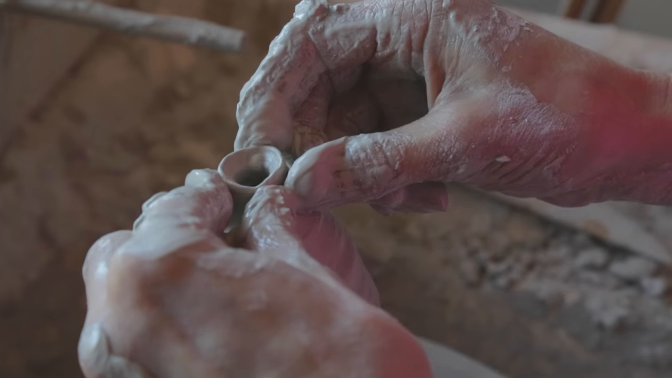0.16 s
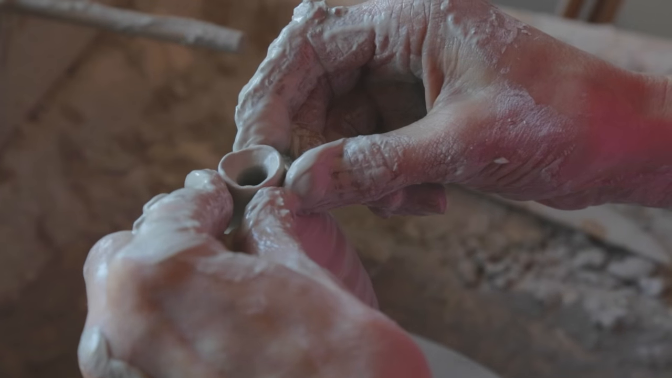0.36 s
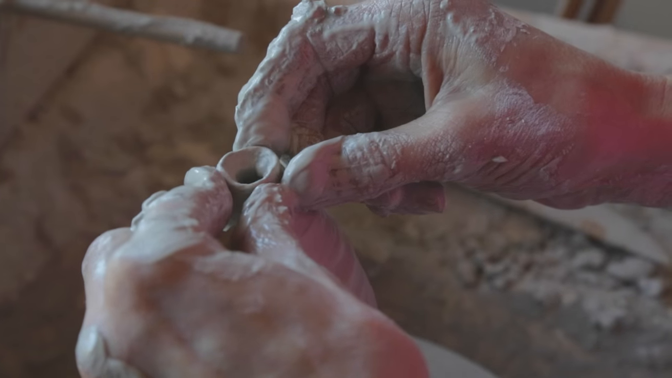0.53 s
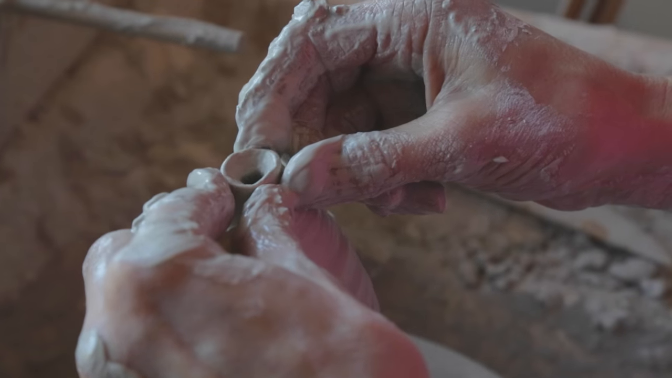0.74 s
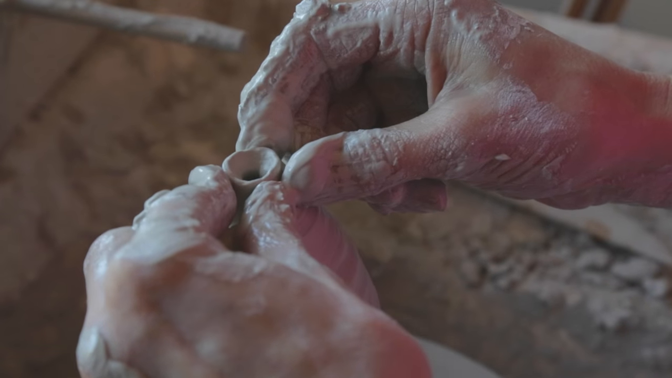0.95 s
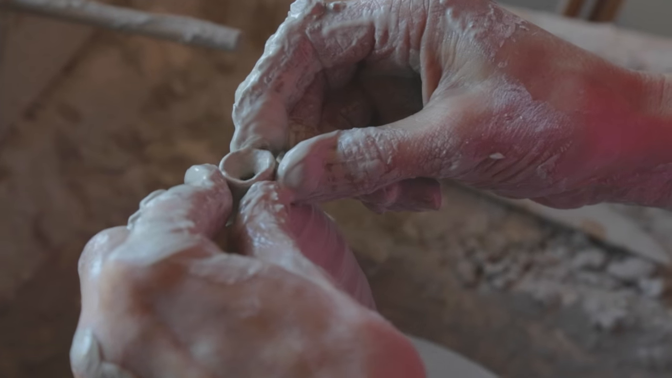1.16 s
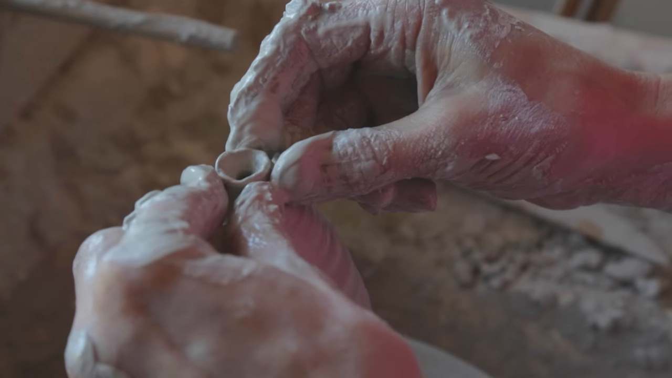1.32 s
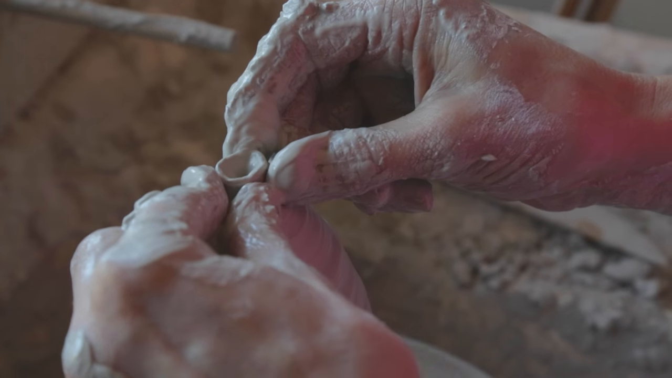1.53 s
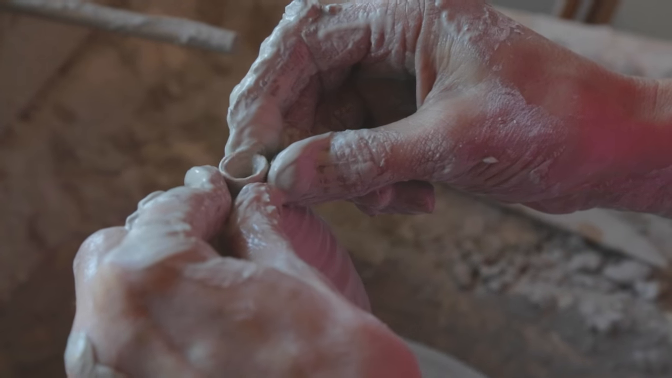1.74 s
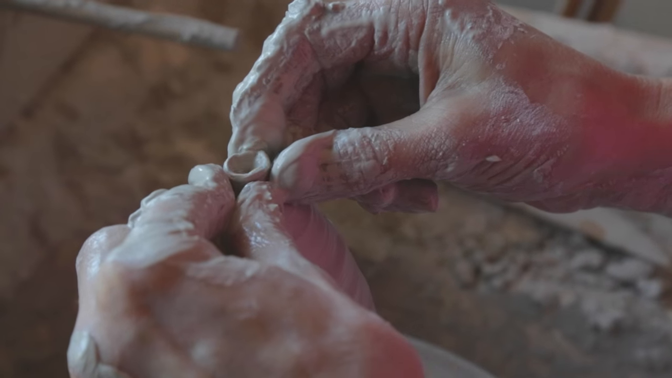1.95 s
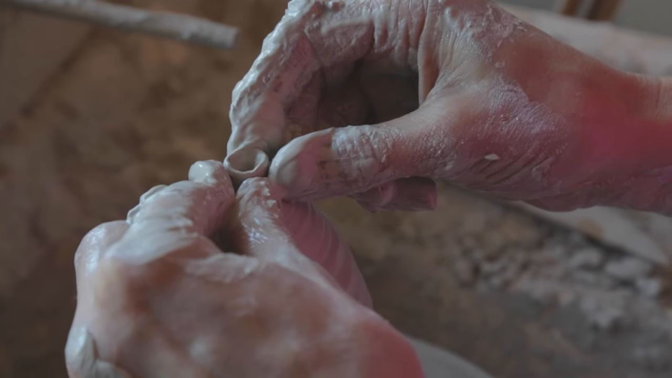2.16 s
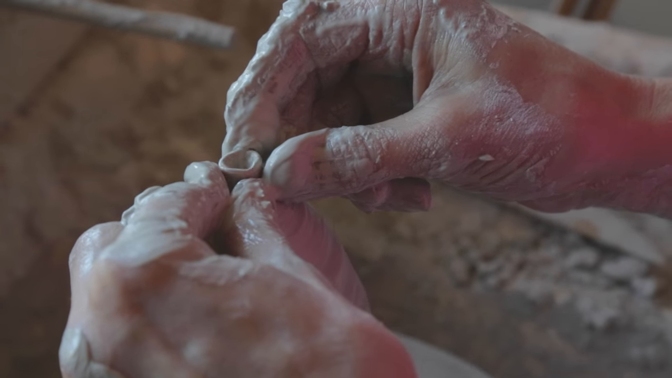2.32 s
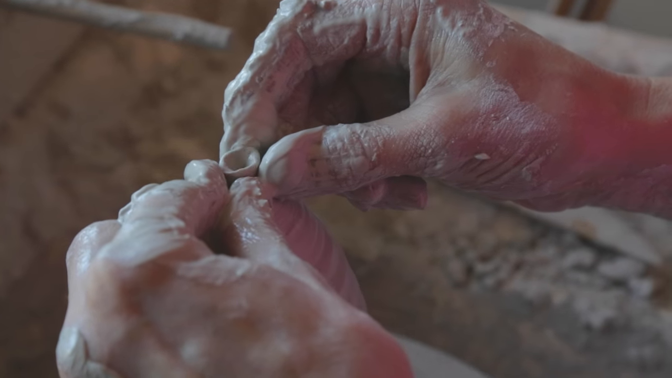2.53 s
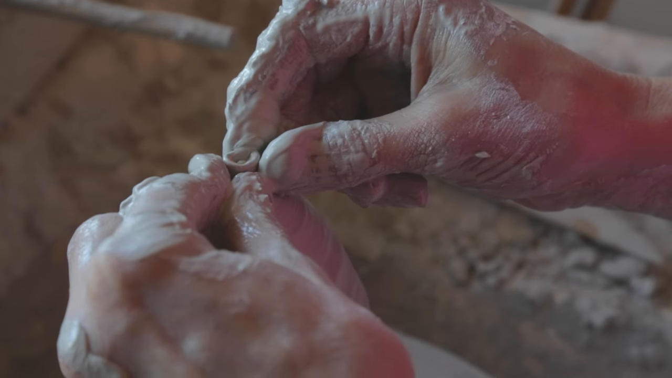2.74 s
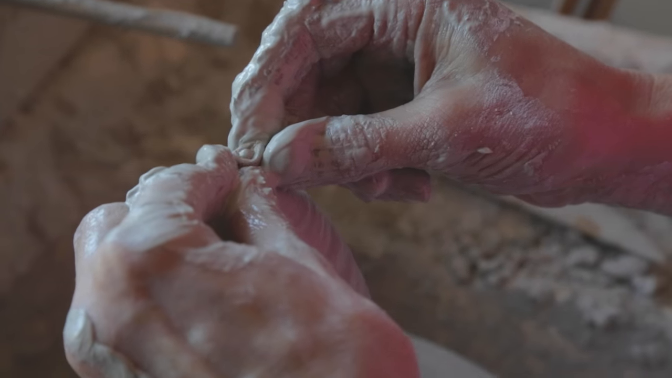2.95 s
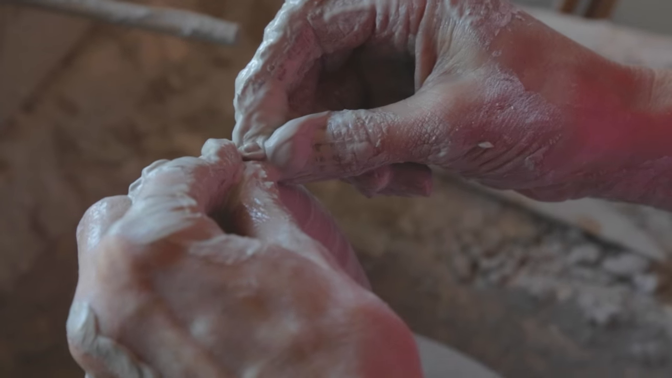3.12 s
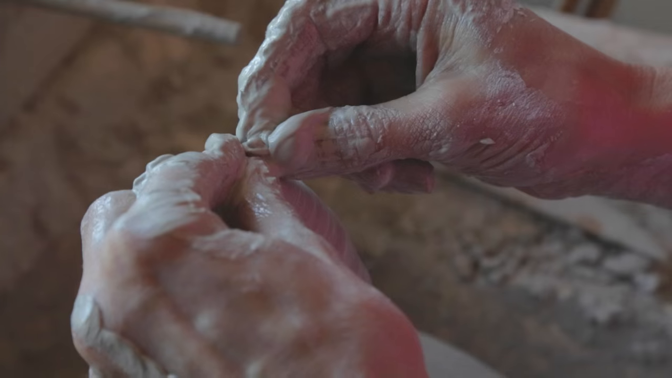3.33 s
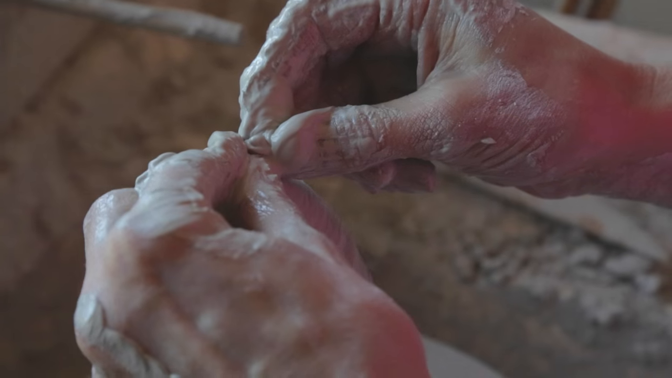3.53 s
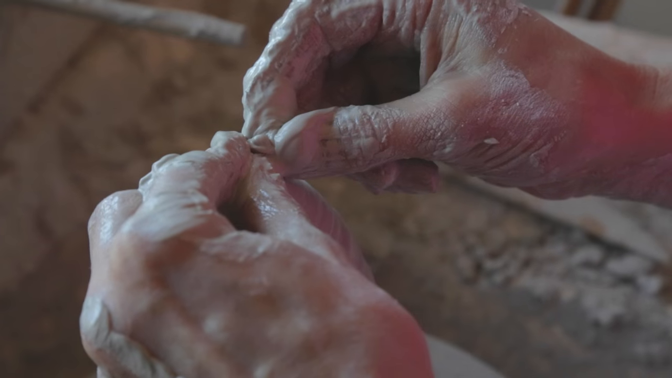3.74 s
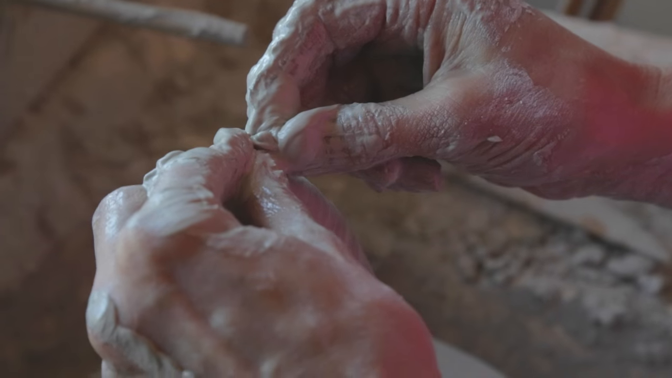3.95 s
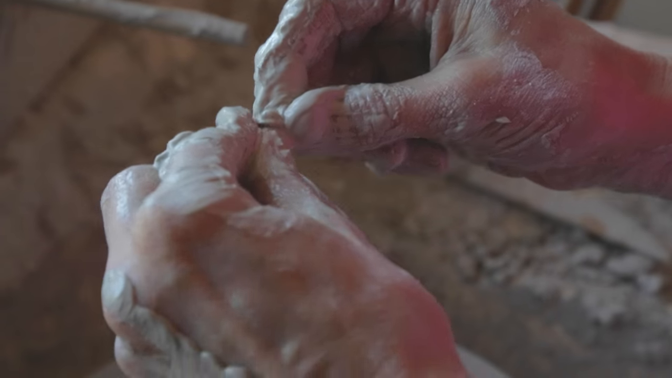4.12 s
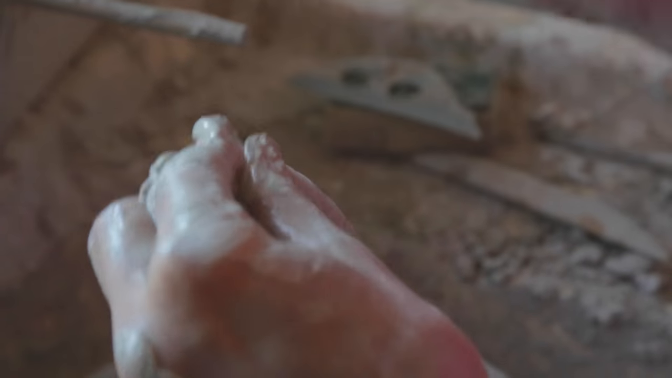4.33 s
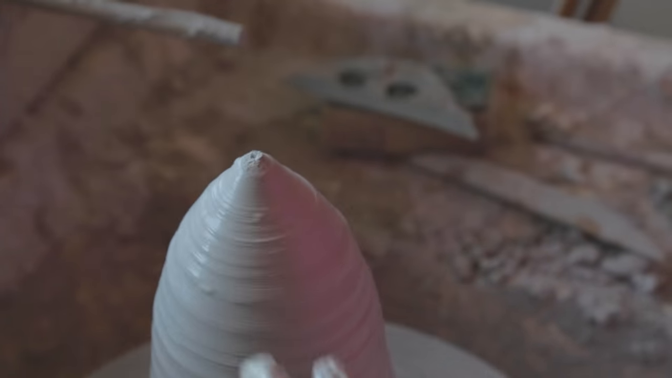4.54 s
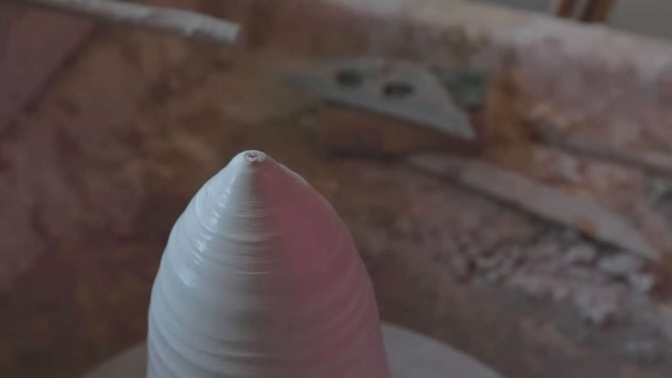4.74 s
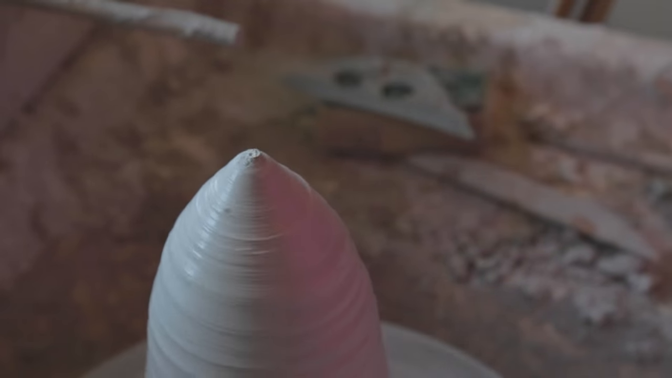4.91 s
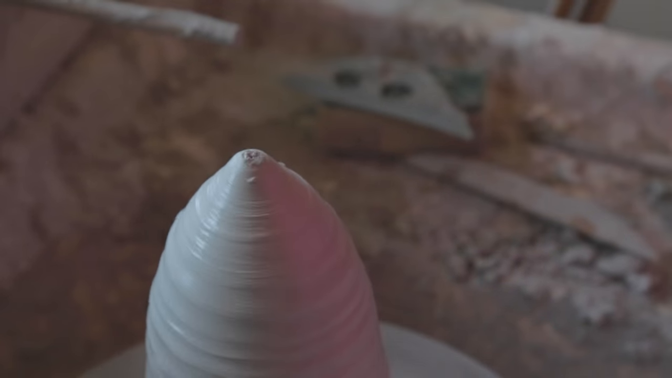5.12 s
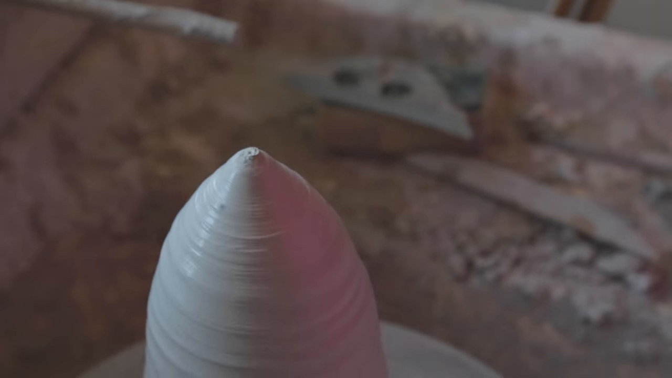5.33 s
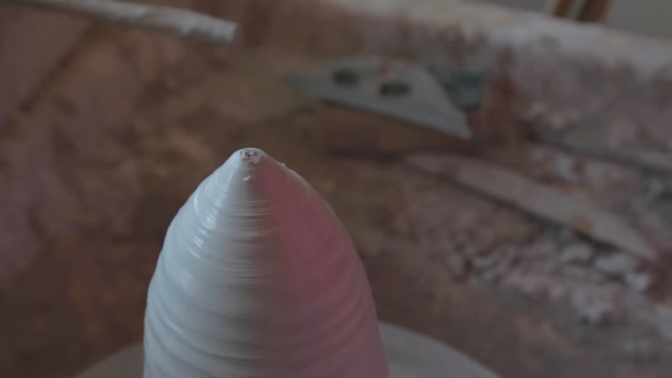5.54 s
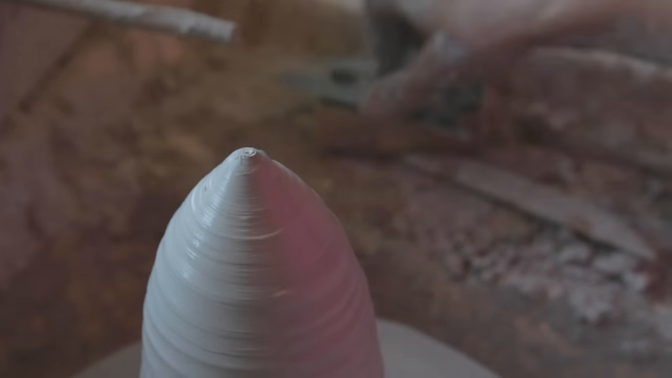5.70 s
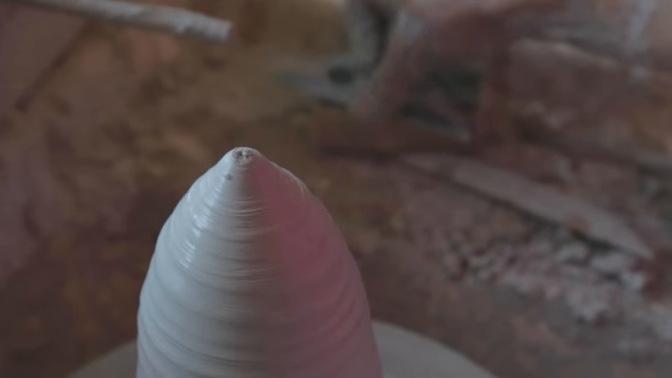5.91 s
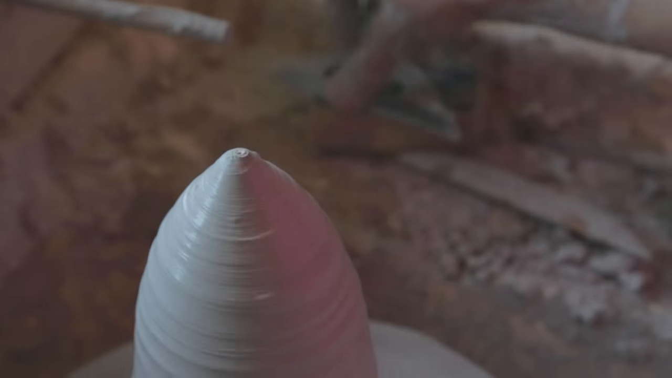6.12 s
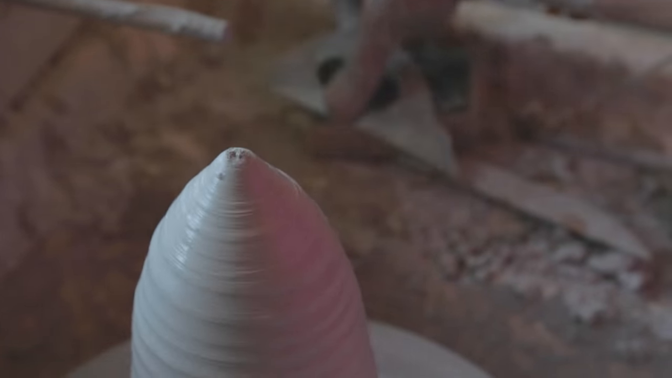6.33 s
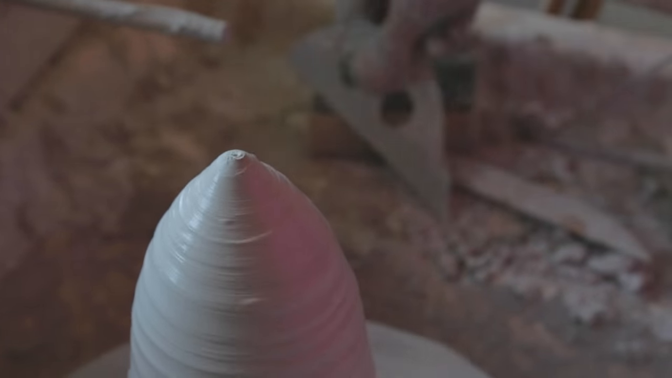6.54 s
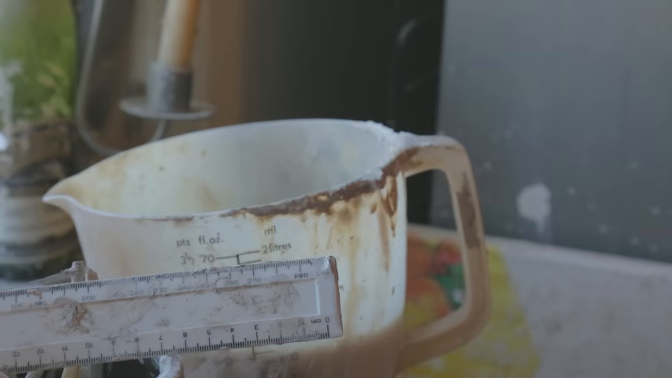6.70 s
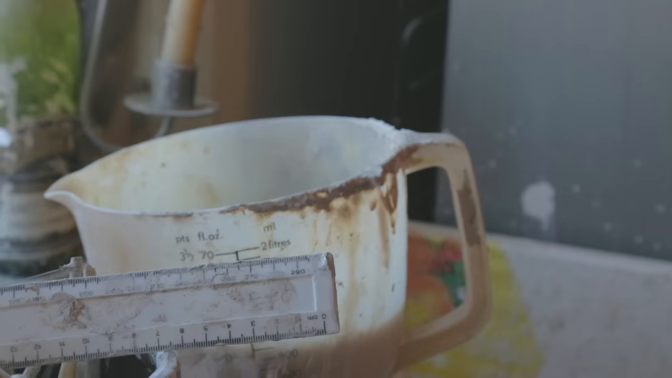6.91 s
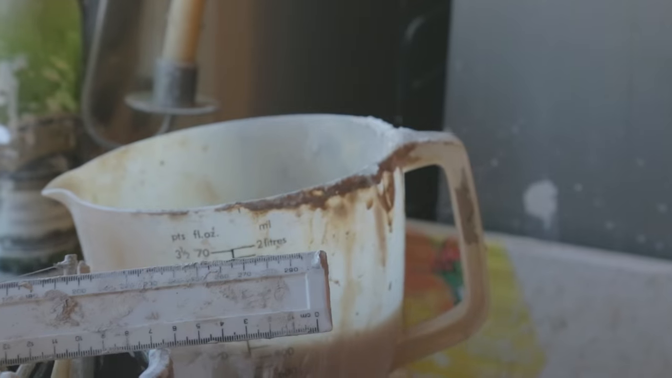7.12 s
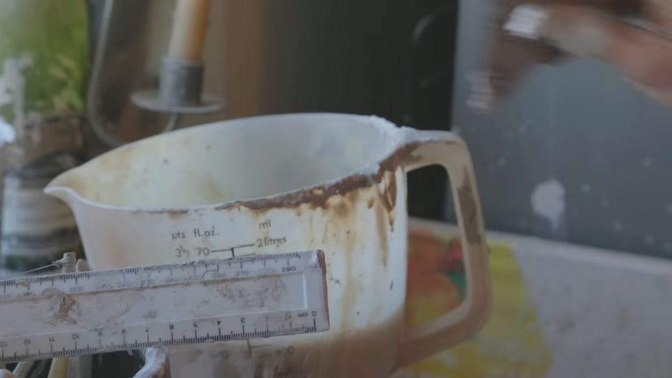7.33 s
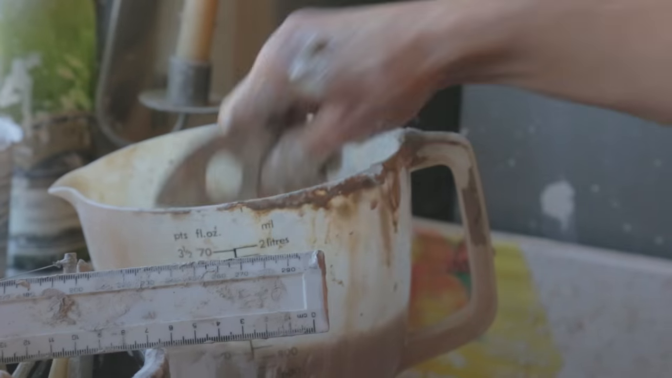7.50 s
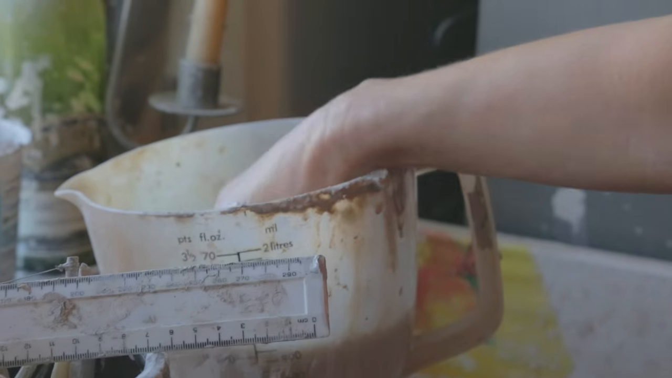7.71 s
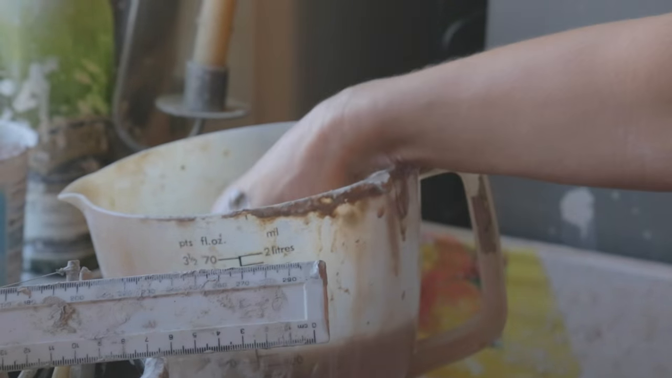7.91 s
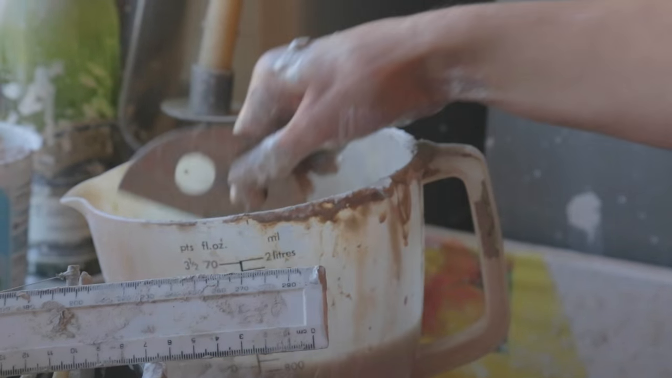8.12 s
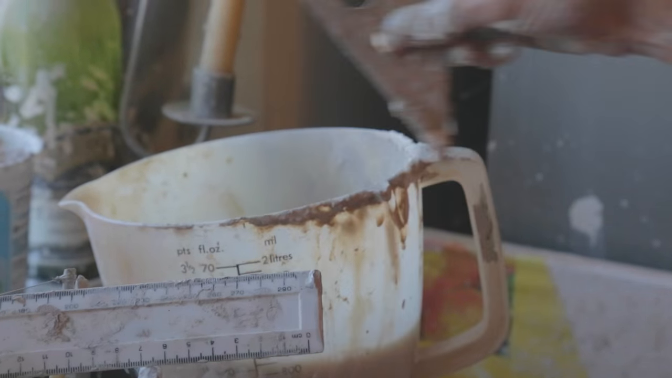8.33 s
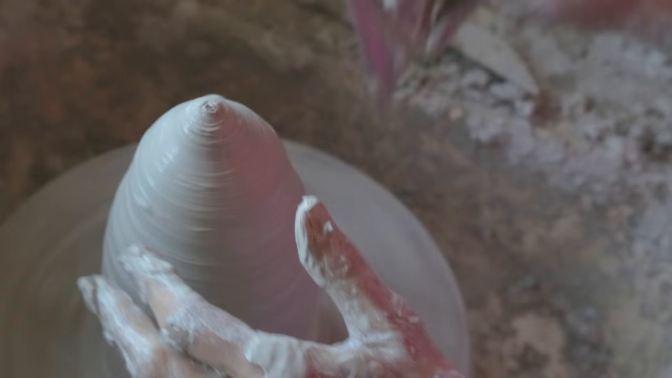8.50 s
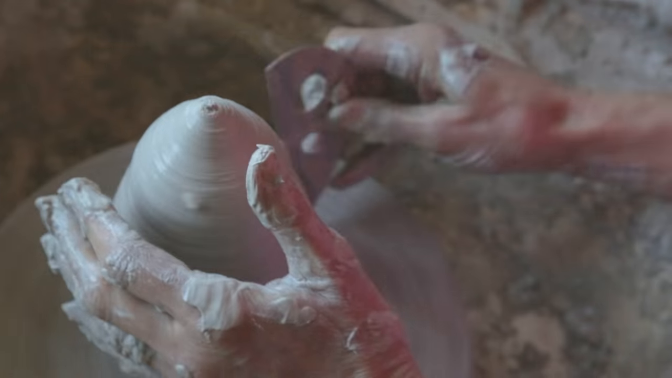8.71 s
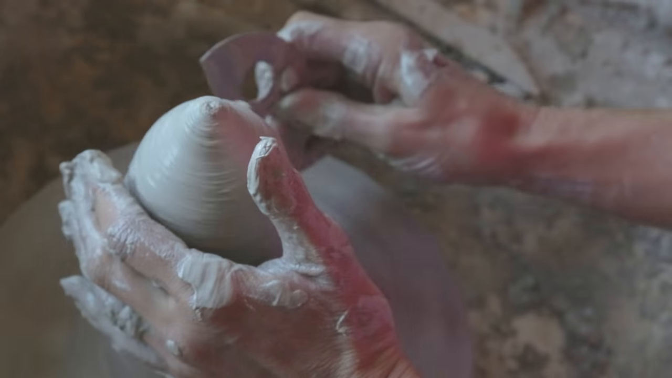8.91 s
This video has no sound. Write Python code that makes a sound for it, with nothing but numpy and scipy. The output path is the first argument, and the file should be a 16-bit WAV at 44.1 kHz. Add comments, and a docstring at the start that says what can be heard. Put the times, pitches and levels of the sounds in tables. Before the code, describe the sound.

Close up in a small studio, a pottery wheel hums and rumbles steadily, swelling slightly with each turn. Quiet wet rubbing and scattered light ticks come from hands on the clay. In the last third a shaping tool clacks, then knocks against a plastic jug with a small slosh and a few drips. The drone shifts slightly in tone, and the tool clacks again and softly wipes the wet pot.

```python
"""An electric potter's wheel runs in a small studio: random forces in its drive excite the resonances of
housing and frame, so that it rumbles, throbs with every turn and whines faintly. Wet fingers rub the turning
clay and make friction noise. A flat rib tool is picked up, knocks in a plastic water jug, drips and is brought
to the pot; each impact rings damped modes. The scene changes from the pot to the jug and back to the wheel, and
other resonances of the drive are heard in each part."""
import sys
import numpy as np
from scipy import signal
from scipy.fft import rfft, irfft
from scipy.io import wavfile
from scipy.ndimage import uniform_filter1d

SR = 44100
rng = np.random.default_rng(int(sys.argv[2]) if len(sys.argv) > 2 else 0)


def transcribe(signal):
    """Save signal, clipped to [-1, 1], as a 16-bit WAV file at the path in sys.argv[1]."""
    frames = np.atleast_2d(signal).T
    limited = np.clip(frames, -1, 1)
    pcm = np.round(limited * 32767).astype(np.int16)
    wavfile.write(sys.argv[1], SR, pcm)


N = 399546


def wheel():
    """Superposition: housing, frame, bearings and motor sound together, and their sum flutters."""
    # throb of bearings and motor (columns as in swell)
    throb = (0.43, .005, 0.23, 0.12, 1)
    body = housing() + frame()
    drive = bearings() + flutter(per_s=11, db=-0.2) * motor()
    return flutter(per_s=26, db=0.67) * (body + from_db(swell(throb)) * drive)


def housing(gain_db=-3.5):
    """Beating: the drive excites closely spaced resonances of the housing, which interfere and boom."""
    # resonances (f/Hz, bandwidth/Hz, level/dB)
    resonances = [(217.6, 13.1, -6), (243.5, 21, -2.5), (251.7, 7.6, -3.5), (263.7, 5.4, -4),
                  (268.45, 11.9, -2.5), (277.8, 13.8, -5), (299.2, 15.2, -5.5)]
    # course of the boom (t/s, level/dB)
    level = [(0.0, -11), (0.2, -12), (0.8, -16), (1.0, -14), (3.0, -16), (3.2, -14.5), (3.4, -18.5),
             (3.6, -15.5), (4.8, -16.5), (5.0, -14.0), (5.6, -18), (5.8, -15), (7.4, -16.5), (7.6, -13),
             (8.8, -18), (9.05, -12)]
    # its throb (columns as in swell)
    throb = (0.96, 0.043, 0.47, 0.11, 0.89)
    boom = steadied(modes(resonances), span_s=.14, share=0.74)
    return from_db(gain_db + in_time(level) + surges() + swell(throb)) * boom


def frame(gain_db=-1.5):
    """Forced vibration: the drive shakes the frame over a broad band and at two resonances."""
    # resonances (f/Hz, bandwidth/Hz, level/dB)
    resonances = [(124.7, 16.2, -1), (166.8, 23, -1)]
    # the upper one is weaker beside the jug (t/s, level/dB)
    upper_level = [(0, 3), (6.65, -1), (6.75, -3), (8.35, -8.5), (8.45, -3)]
    # broad shudder (f/Hz, level/dB)
    spectrum = [(20, -37), (52, -35), (62, -35), (75, -16), (90, -8.5), (112, -5.5), (145, -14.5),
                (190, -5), (230, -2.5), (330, -34)]
    # course of the whole vibration (t/s, level/dB)
    level = [(0.0, -23.5), (0.6, -23.5), (1.2, -25.5), (2.8, -23.5), (3.2, -25), (4.0, -22.5), (4.4, -26.5),
             (5.0, -21.5), (5.6, -24), (5.8, -21.1), (7.2, -25), (7.4, -20), (7.6, -26), (8.4, -27),
             (8.6, -21), (9.05, -25)]
    # its throb (columns as in swell)
    throb = (1.34, 0.092, 0.27, .11, 1.1)
    lower, upper = resonances
    ring = modes([lower]) + from_db(in_time(upper_level)) * modes([upper])
    shudder = steadied(ring + from_db(-1.0) * coloured(forces(), spectrum), span_s=.2, share=0.83)
    return from_db(gain_db + in_time(level) + swell(throb)) * shudder


def bearings(rumble_db=-1.62, whirr_db=-2.0, split_hz=600):
    """Rolling noise: random forces and tiny impacts give a low rumble and a higher whirr."""
    # rolling noise (f/Hz, level/dB)
    spectrum = [(230, -9.5), (320, -2.5), (355, 1.5), (395, -2.5), (430, -5.5), (490, -5), (570, -9.5),
                (605, -15), (670, -10.5), (745, -15), (850, -16), (1000, -25), (1250, -34.5), (1700, -47)]
    # the rumble follows the load on the drive (t/s, level/dB)
    load = [(0.0, -21), (0.2, -19), (0.4, -20), (1.0, -18), (1.2, -21), (2.4, -18.5), (3.8, -19.5),
            (5.0, -18.5), (6.8, -21.5), (7.0, -17.5), (7.6, -21.5), (7.8, -19), (8.2, -19.5), (8.6, -18),
            (8.8, -24.5), (9.05, -17)]
    # the whirr is weaker beside the jug (t/s, level/dB)
    whirr_level = [(0.0, -28.5), (0.2, -29), (0.4, -31), (1.0, -29.5), (1.4, -31), (2.0, -27.5),
                   (3.0, -30.5), (3.2, -29), (4.0, -31.5), (4.2, -29), (5.8, -29.5), (6.6, -33), (6.8, -34),
                   (7.0, -30), (7.6, -33.5), (9.05, -31)]
    roll = coloured(forces() + 0.65 * grains(per_s=400, spread_db=3.0), spectrum)
    rumble = steadied(butter(roll, split_hz, "low", order=5), span_s=0.16, share=0.51)
    whirr = steadied(butter(roll, split_hz, "high", order=5), span_s=0.16, share=0.51)
    return from_db(rumble_db + in_time(load)) * rumble + from_db(whirr_db + in_time(whirr_level)) * whirr


def motor(whine_db=0.8):
    """Transmission depends on position: different resonances of the drive carry to each place."""
    # motor whine and ring of the wheel's pan, close to the pot (f/Hz, bandwidth/Hz, level/dB)
    whine = [(1293, 5, -58.5), (1394, 5, -55.5), (1435, 90, -60), (1567, 16, -63.5), (1696, 5, -64.5),
             (2347, 40, -64), (3590, 110, -61), (3790, 80, -61.5), (3963, 70, -66), (5674, 20, -73.5),
             (7047, 20, -77), (9453, 70, -80)]
    pan = [(390, 15, -36), (549, 21, -40.5), (677.3, 22, -43)]
    # drone beside the jug, and back at the wheel (f/Hz, bandwidth/Hz, level/dB)
    at_jug = [(350.3, 14, -34.5), (488, 34, -35), (2930, 60, -60), (3500, 90, -59)]
    at_wheel = [(186, 32, -30.5), (407.4, 24, -33), (549, 27, -37), (1050, 25, -54), (1299, 5.4, -51.5),
                (3380, 200, -55.5), (7880, 110, -68)]
    close = from_db(whine_db) * modes(whine) + modes(pan)
    return heard_from(0) * close + heard_from(1) * modes(at_jug) + heard_from(2) * modes(at_wheel)


def forces(count=N, repeat_share=0.19, motor_turn_s=.0834):
    """Comb filtering: part of the drive's random force recurs on the next two turns of the motor."""
    fresh, turn = rng.standard_normal(count), int(motor_turn_s * SR)
    return fresh + repeat_share * (np.roll(fresh, turn) + np.roll(fresh, 2 * turn))


def swell(throb, turns_per_s=2.39):
    """Amplitude modulation, in dB: the off-centre load swells the sound once and twice a turn."""
    # wheel and rubbing also dip briefly together (middle t/s, duration/s, depth/dB)
    lulls = [(0.387, 0.18, 4.5), (0.663, 0.37, 1.5), (1.396, 0.2, 2.5), (3.14, 0.37, 3), (4.034, 0.21, 2),
             (4.435, 0.23, 2.5), (4.8, 0.23, 3), (5.213, 0.22, 5), (5.65, 0.3, 2), (6.5, 0.092, 0.5),
             (7.222, 0.24, 2), (7.97, 0.2, 3.5), (8.265, 0.1, 2), (8.484, 0.093, 3.5)]
    once_db, once_crest_s, twice_db, twice_crest_s, lull_share = throb
    t, omega = np.arange(N) / SR, 2 * np.pi * turns_per_s
    out = once_db * np.cos(omega * (t - once_crest_s))
    out += twice_db * np.cos(2 * omega * (t - twice_crest_s))
    for s, length_s, depth_db in lulls:
        add(out, s - length_s / 2, -lull_share * depth_db * np.hanning(int(length_s * SR)))
    return out


def surges(length_s=0.096):
    """Envelope peaks, in dB: the boom rises briefly and smoothly."""
    # strongest surges (middle t/s, rise/dB)
    peaks = [(.29, 4.5), (.52, 3.5), (1.01, 4), (1.24, 4), (1.93, 6.5), (2.37, 6), (3.19, 7), (3.47, 5.5),
             (3.85, 3), (4.28, 1.5), (5.33, 7.5), (5.55, 2.5), (6.41, 4), (7.11, 5), (7.73, 6), (8.44, 6.5),
             (8.92, 4)]
    out, shape = np.zeros(N), np.hanning(int(length_s * SR))
    for s, rise_db in peaks:
        add(out, s - length_s / 2, rise_db * shape)
    return out


def rumble_bumps():
    """Damped oscillation: brief, dull bumps stand out of the rumble."""
    # modes of a bump (f/Hz, level/dB, T60/s)
    ring = [(525, 2, 0.038), (670, 7.5, 0.015), (830, -1.5, 0.022)]
    # bumps (t/s, level/dB)
    bumps = [(.220, -24), (1.317, -27), (3.171, -22), (4.327, -26), (4.360, -25), (4.546, -25),
             (5.094, -28), (5.605, -23), (8.582, -24)]
    return struck(ring, bumps, crack_db=-29)


def hands():
    """Friction noise: grit drags under fingers that grip and slide, and the wet slip hisses."""
    # rubbing close to the pot, and further off without its rasp (f/Hz, level/dB)
    near = [(700, -2), (1100, 7), (1450, 4.5), (1700, 1.5), (2100, -0.5), (2600, 1), (3300, -0.5),
            (3800, 0), (4250, -3.5), (4600, -16.5), (6000, -22), (9000, -43)]
    far = [(700, -3), (1100, 5.5), (1450, 7.5), (1700, 0), (2100, -1), (2600, -1), (3400, -2.5),
           (3900, -2.5), (4500, -9), (5300, -14), (6000, -17.5), (9000, -42)]
    # hiss of the slip (f/Hz, level/dB)
    slip = [(2500, -9.5), (4500, 4.5), (5500, 4.5), (6400, 2), (7200, 3), (8300, 0), (10500, -0.5),
            (12500, -3), (14000, -3), (15700, -6.5)]
    rub_gain, hiss_gain = pressure()
    grip, close = flutter(per_s=30, db=1.5), heard_from(0)
    grit = rng.standard_normal(N) + 0.47 * grains(per_s=700, spread_db=5.5)
    grit = near_echoes(grit, db=-12, decay_s=.012)
    rub = close * coloured(grit, near) + (1 - close) * coloured(grit, far)
    film = rng.standard_normal(N) + 0.32 * grains(per_s=1700, spread_db=8.5)
    hiss = coloured(near_echoes(film, db=-8.5, decay_s=0.024), slip)
    return grip * (rub_gain * rub + hiss_gain * hiss)


def pressure(rest_db=-4.5, wet_db=-3.0):
    """Incoherent addition: resting touch and presses sum in power to the gains of rubbing and hiss."""
    # resting fingers and wet slip (t/s, level/dB)
    touch = [(0.0, -41), (0.8, -42.5), (1.0, -41.5), (1.2, -42.5), (1.6, -40.5), (3.0, -41), (3.6, -40.5),
             (4.0, -42), (5.8, -39.5), (6.2, -43.5), (7.0, -38), (7.2, -37), (7.4, -39), (9.05, -41)]
    wetness = [(0.0, -53), (1.0, -52.4), (1.2, -53.5), (1.8, -51), (2.8, -50.5), (3.0, -52), (4.8, -51.5),
               (5.6, -51.5), (5.8, -48.5), (6.0, -51.5), (7.6, -52.5), (8.2, -56), (8.4, -50.5),
               (8.6, -53.5), (8.8, -50), (9.05, -55)]
    # their throbs (columns as in swell)
    rub_throb = (0.39, 0.12, 0.43, 0.096, 0.68)
    hiss_throb = (0.58, 0.27, 0.5, 0.023, 0.36)
    # the fingers press harder (middle t/s, duration/s, rubbing level/dB, hiss level/dB)
    presses = [(0.203, 0.25, -50, -53), (.53, .12, -47, -60), (0.906, 0.36, -45, -58),
               (2.143, 0.095, -50, -58), (2.345, 0.1, -43, -54), (2.817, 0.35, -48, -61),
               (2.974, 0.074, -47, -54), (3.43, .12, -45, -57), (3.77, 0.23, -40, -61),
               (4.25, 0.18, -44, -57), (4.704, 0.13, -39, -67), (4.913, 0.18, -48, -53),
               (5.004, 0.12, -39.5, -58), (5.328, 0.086, -41, -51), (5.544, 0.11, -44, -56),
               (5.774, 0.16, -47, -56), (6.385, 0.12, -50, -58), (6.594, 0.2, -56, -54),
               (7.443, 0.22, -42.5, -57), (7.7, 0.19, -48, -53), (8.11, 0.16, -50, -56),
               (8.406, 0.15, -41, -63), (8.564, 0.083, -42, -58.5), (8.75, .12, -44, -61)]
    rub_power = from_db(rest_db + in_time(touch) + swell(rub_throb)) ** 2
    hiss_power = from_db(wet_db + in_time(wetness) + swell(hiss_throb)) ** 2
    for s, length_s, rub_db, hiss_db in presses:
        press = np.hanning(int(length_s * SR))
        add(rub_power, s - length_s / 2, (from_db(rub_db) * press) ** 2)
        add(hiss_power, s - length_s / 2, (from_db(hiss_db) * press) ** 2)
    return np.sqrt(rub_power), np.sqrt(hiss_power)


def bubbles(fizz_db=-76, fizz_band_hz=(6050, 6450)):
    """Bubble resonance: small bubbles ring as they burst in the slip under the fingers."""
    # modes of a bubble (f/Hz, level/dB, T60/s)
    bubble = [(6240, -0.5, .022), (5650, -9, .014)]
    # distinct bursts (t/s, level/dB)
    ticks = [(.066, -47), (.428, -48), (.565, -44), (.745, -46), (1.083, -44), (1.82, -46), (2.096, -47),
             (2.686, -46), (2.75, -46), (3.27, -47), (3.622, -43), (4.195, -39), (4.934, -44), (5.31, -47),
             (6.159, -43), (6.362, -45)]
    fizz = rms_one(butter(grains(per_s=32, spread_db=3.0), fizz_band_hz, "band", order=1))
    return from_db(fizz_db) * heard_from(0) * fizz + struck(bubble, ticks, crack_db=-8)


def jug():
    """Impact excitation: the tool knocks in the jug of water and rings its modes."""
    # modes (f/Hz, level/dB, T60/s)
    body = [(705, -5, .04), (818, 5.5, .095), (930, -3, .03), (1168, -13, .04), (1400, 4, .033),
            (1470, -11, .08), (1593, -7, .05), (1900, -9, .03), (2440, -19, .06), (2790, -15, .06),
            (3630, -15, .05)]
    # knocks (t/s, level/dB)
    knocks = [(7.833, -13.5), (7.858, -29), (8.066, -32.5)]
    return struck(body, knocks, crack_db=-26)


def rib():
    """Free vibration: once struck, the flat tool clacks and its corner clinks."""
    # modes of the tool and of its corner (f/Hz, level/dB, T60/s)
    blade = [(830, -8, .03), (1250, 0, .04), (1440, -1, .035), (1900, -5, .025), (2200, -3, .03),
             (2420, -4, .035), (2850, -6, .025), (3370, -13, .04), (3600, -11, .05)]
    corner = [(1276, -7, .06), (2400, -8, .025), (2700, -7, .02), (3350, -1, .028), (3650, 0, .028)]
    # hits on each (t/s, level/dB)
    clacks = [(6.612, -27.5), (6.627, -38), (8.403, -23.5), (8.411, -37)]
    clinks = [(6.7185, -31), (6.724, -40)]
    return struck(blade, clacks, crack_db=-13) + struck(corner, clinks, crack_db=-14)


def taps(split_hz=3900, edge_db=-21, reference_hz=2800, edge_db_per_octave=17):
    """Contact noise: a dying burst of tiny impacts, with a bright edge that grows with its pitch."""
    # light taps and wet smacks (t/s, level/dB, f/Hz, T60/s)
    contacts = [(.441, -44, 2900, .05), (.546, -43, 3900, .06), (1.635, -35.5, 2300, .045),
                (1.750, -44, 2600, .05), (1.954, -42, 2700, .05), (2.336, -41, 3400, .04),
                (2.965, -42, 3700, .03), (3.199, -44, 2600, .045), (3.284, -34.5, 1700, .07),
                (3.623, -42, 3500, 0.043), (4.100, -37, 2400, .04), (4.686, -39, 2700, .035),
                (4.727, -33, 1900, .05), (5.477, -36, 1900, .06), (6.163, -43, 2800, .035),
                (6.404, -40, 2400, .035), (6.6115, -20, 1040, 0.047), (6.614, -33, 3900, 0.11),
                (6.621, -40, 5200, .035), (6.630, -40, 5400, .03), (6.718, -35, 2900, .025),
                (6.719, -30, 1050, .04), (7.421, -39, 2600, .04), (7.496, -36, 2200, .035),
                (7.73, -30.5, 1800, 0.032), (7.8335, -20, 910, 0.04), (7.833, -24.5, 2790, 0.045),
                (7.8575, -39, 4600, .03), (7.862, -24, 1250, .03), (8.066, -33, 4000, 0.046),
                (8.106, -31, 2600, 0.05), (8.138, -41, 2600, 0.074), (8.205, -40, 2400, .06),
                (8.403, -22, 1900, 0.028), (8.776, -36, 3380, 0.03), (8.790, -42, 4500, .02)]
    out, t = np.zeros(N), np.arange(SR // 3) / SR
    for s, db, hz, t60 in contacts:
        burst = rng.standard_normal(len(t))
        band = butter(burst, [hz * 0.6, hz * 1.26], "band", order=3)
        body = rms_one(butter(band, split_hz, "low", order=8))
        edge = rms_one(butter(butter(burst, split_hz, "high"), 8100, "low", order=1))
        edge_gain = from_db(edge_db + edge_db_per_octave * np.log2(hz / reference_hz))
        add(out, s, from_db(db - 60 * t / t60) * (body + edge_gain * edge))
    return out


def snaps(band_hz=(4800, 5200), t60_s=0.0074):
    """Onset transient: the tool's hard edge lands with a brief, bright crack."""
    # landings (t/s, level/dB)
    landings = [(6.6115, -31), (7.8328, -34), (7.8572, -38), (8.0662, -35), (8.403, -38)]
    out, t = np.zeros(N), np.arange(SR // 20) / SR
    for s, db in landings:
        crack = rms_one(butter(rng.standard_normal(len(t)), band_hz, "band", order=1))
        add(out, s, from_db(db - 60 * t / t60_s) * crack)
    return out


def drips():
    """Damped oscillation: each drip rings briefly as it falls back into the jug."""
    # modes of a drip (f/Hz, level/dB, T60/s)
    ring = [(2300, -2, .02), (2950, -10, .025), (3640, 0, 0.036)]
    # drips (t/s, level/dB)
    falls = [(8.068, -37), (8.107, -33), (8.139, -44), (8.157, -43), (8.206, -49)]
    return struck(ring, falls, crack_db=-16)


def slosh():
    """Shot noise: droplets spatter at random while the tool drags through the water."""
    # strokes (start t/s, duration/s, level/dB)
    strokes = [(8.072, 0.054, -37.5), (8.12, .05, -44)]
    # spatter (f/Hz, level/dB)
    spectrum = [(1100, -1), (1700, 3), (2900, 0), (3700, 2), (4400, -10), (6000, -12), (9000, -24),
                (14000, -24)]
    gain = np.zeros(N)
    for s, length_s, db in strokes:
        add(gain, s, from_db(db) * signal.windows.tukey(int(length_s * SR), .5))
    return gain * coloured(grains(per_s=2500, spread_db=3.0), spectrum)


def sizzle():
    """Shot noise: tiny bubbles tear as the wet rib wipes the pot."""
    # wipes (middle t/s, duration/s, level/dB)
    wipes = [(8.74, .12, -55), (8.862, .12, -52), (8.975, .14, -56)]
    # sizzle (f/Hz, level/dB)
    spectrum = [(6000, -3), (7900, 0), (9300, -7), (11200, 0), (13000, 0), (14500, -3), (15700, -7)]
    gain = np.zeros(N)
    for s, length_s, db in wipes:
        add(gain, s - length_s / 2, from_db(db) * np.hanning(int(length_s * SR)))
    bursts = near_echoes(grains(per_s=1800, spread_db=4.0), db=-4, decay_s=.006)
    return gain * coloured(bursts, spectrum)


def squeaks():
    """Band-limited noise: thin squeaks and hisses swell and fade."""
    # bands (start t/s, end t/s, f/Hz, bandwidth/Hz, level/dB)
    bands = [(.88, 1.03, 3860, 600, -47), (2.099, 2.19, 2360, 400, -49), (2.58, 2.675, 2400, 400, -51),
             (2.949, 3.03, 2400, 400, -51), (6.555, 6.678, 3770, 350, -52), (6.68, 7.8, 5050, 700, -62),
             (6.9, 7.8, 10700, 700, -68), (7.3, 7.75, 13700, 900, -70), (8.29, 8.36, 13000, 3500, -63),
             (8.75, 8.82, 4800, 570, -51)]
    out = np.zeros(N)
    for start, end, hz, width_hz, db in bands:
        envelope = signal.windows.tukey(int((end - start) * SR), .5)
        hiss = butter(rng.standard_normal(2 * SR), [hz - width_hz / 2, hz + width_hz / 2], "band")
        add(out, start, from_db(db) * envelope * rms_one(hiss)[:len(envelope)])
    return out


def pop(thud_s=0.0017, tick_s=0.00024):
    """Pressure pulse: one brief push gives a soft low pop, and its sharp start a tick."""
    # pulse (t/s, thud level/dB, tick level/dB)
    pulse = (8.5787, -22.5, -19)
    s, thud_db, tick_db = pulse
    out, t = np.zeros(N), np.arange(SR // 10) / SR
    thud = from_db(thud_db) * t / thud_s * np.exp(1 - t / thud_s)
    add(out, s, thud + from_db(tick_db) * np.exp(-t / tick_s))
    return butter(out, 18, "high", order=1)


def near_echoes(x, db, decay_s):
    """Interference: early reflections from wheel and bench ripple the spectrum."""
    cluster = rng.standard_normal(SR // 20) * np.exp(-np.arange(SR // 20) / (decay_s * SR))
    return x + from_db(db) * signal.fftconvolve(x, cluster / np.linalg.norm(cluster))[:N]


def studio(x, t60_s=0.13, tail_db=-15, delay_s=.006):
    """Reverberation: the nearby walls return a short, dull tail."""
    t = np.arange(SR // 2) / SR
    tail = butter(rng.standard_normal(len(t)), 4500, "low") * from_db(-60 * t / t60_s) * (t > delay_s)
    return x + from_db(tail_db) * signal.fftconvolve(x, tail / np.linalg.norm(tail))[:N]


def heard_from(place, fade_s=.02, changes_s=(6.742, 8.47)):
    """Crossfade: 1 during the part of the scene heard at a place (0 pot, 1 jug, 2 wheel), else 0."""
    here = np.searchsorted(changes_s, np.arange(N) / SR) == place
    return uniform_filter1d(here * 1., int(fade_s * SR))


def modes(table, run_in=SR // 2):
    """Forced resonance: random forces keep steep-sided bands ringing, each at its level."""
    out = np.zeros(N)
    for hz, width_hz, db in table:
        ring = butter(forces(N + run_in), [hz - width_hz / 2, hz + width_hz / 2], "band")
        out += from_db(db) * rms_one(ring[run_in:])
    return out


def struck(body, hits, crack_db, crack_s=.0006):
    """Modal superposition: each hit gives a brief crack and a sum of decaying sinusoids."""
    out, t = np.zeros(N), np.arange(SR // 2) / SR
    ring = sum(from_db(db - 60 * t / t60) * np.sin(2 * np.pi * hz * t) * (-1) ** k
               for k, (hz, db, t60) in enumerate(body))
    for s, db in hits:
        crack = butter(rng.standard_normal(len(t)), 7000, "low", order=1) * np.exp(-t / crack_s)
        add(out, s, from_db(db) * (ring + from_db(crack_db) * crack))
    return out


def grains(per_s, spread_db):
    """Poisson process: tiny clicks at random times, a few much larger than the rest; rms 1."""
    sizes = from_db(spread_db * np.minimum(rng.exponential(1, N), 4))
    return rms_one(sizes * rng.choice([-1, 1], N) * (rng.random(N) < per_s / SR))


def flutter(per_s, db):
    """Random modulation: a gain that wavers."""
    knots = rng.standard_normal(N // 1000)
    return from_db(db * np.interp(np.arange(N) / SR * per_s, np.arange(len(knots)), knots))


def steadied(x, span_s, share):
    """Compression: even out a share of the slow swells and keep the fast flutter; rms 1."""
    power = uniform_filter1d(x ** 2, int(span_s * SR)) + 1e-12
    return rms_one(x / power ** (share / 2))


def coloured(x, spectrum):
    """Spectral shaping: weight a sound by a curve that falls away beyond its ends; rms 1."""
    hz, db = np.transpose(spectrum)
    f = np.maximum(np.arange(N // 2 + 1) * SR / N, 1)
    ends = np.minimum(f / hz[0], 1) ** 2 * np.minimum(hz[-1] / f, 1) ** 4
    gain = from_db(np.interp(np.log(f), np.log(hz), db))
    return rms_one(irfft(rfft(x) * ends * gain, N))


def butter(x, hz, kind, order=2):
    """Causal, maximally flat filter."""
    return signal.sosfilt(signal.butter(order, hz, kind, fs=SR, output="sos"), x)


def in_time(curve):
    """Linear interpolation of a level curve at every sample."""
    return np.interp(np.arange(N) / SR, *np.transpose(curve))


def from_db(db):
    """Decibels to amplitude ratio."""
    return 10 ** (np.asarray(db) / 20)


def rms_one(x):
    """Normalisation to unit rms."""
    return x / np.sqrt(np.mean(x ** 2) + 1e-20)


def add(out, s, sound):
    """Superpose a sound from time s."""
    at = int(s * SR)
    out[at:at + len(sound)] += sound[:N - at]


def scene():
    """Superposition of wheel, hands and tool from close by; tool, water and bumps reverberate."""
    tool = jug() + rib() + taps() + snaps()
    water = drips() + slosh()
    bumps = rumble_bumps()
    direct = wheel() + hands() + bubbles() + squeaks() + sizzle()
    return (direct + studio(tool + water + bumps) + pop())[None]


def record(dry, cutoff_hz=15700):
    """Band limiting: an elliptic low-pass cuts the top steeply."""
    return signal.sosfilt(signal.ellip(12, .1, 90, cutoff_hz, fs=SR, output="sos"), dry)


dry = scene()
out = record(dry)
transcribe(out)
```